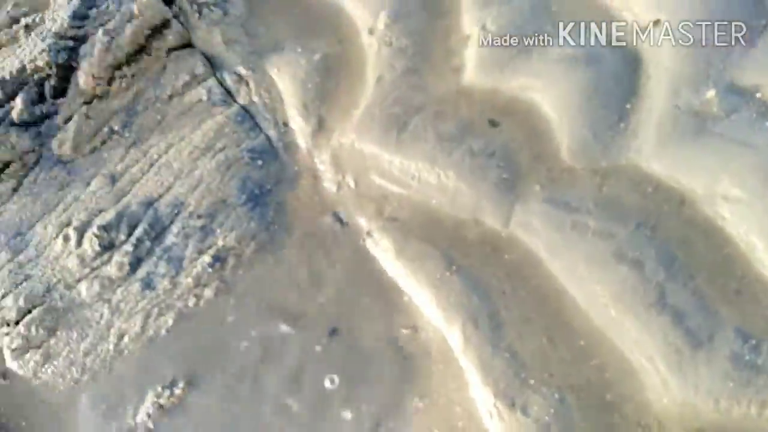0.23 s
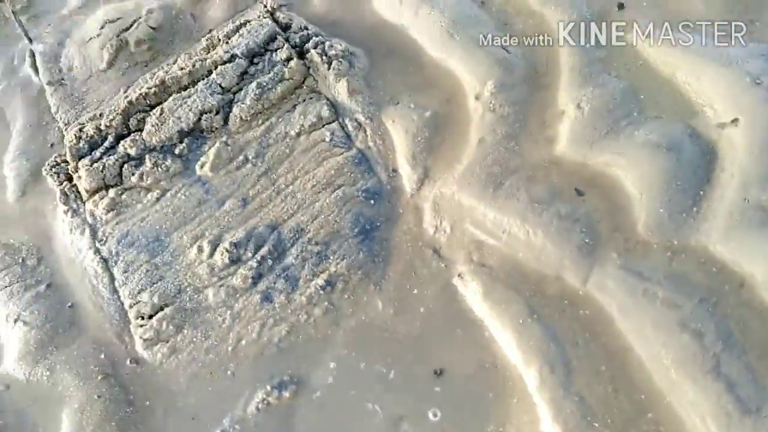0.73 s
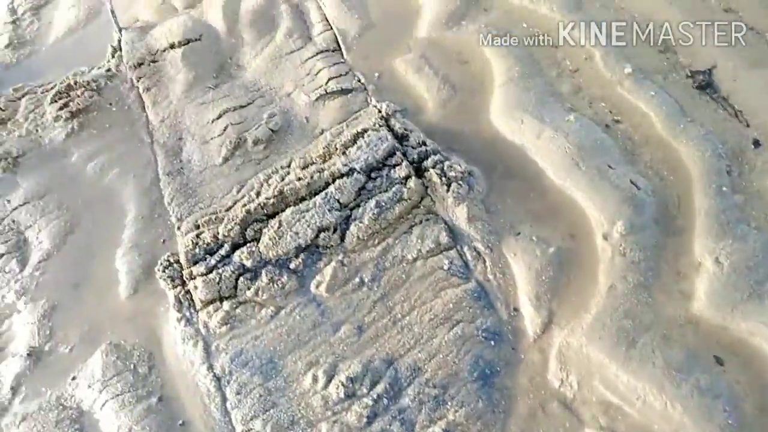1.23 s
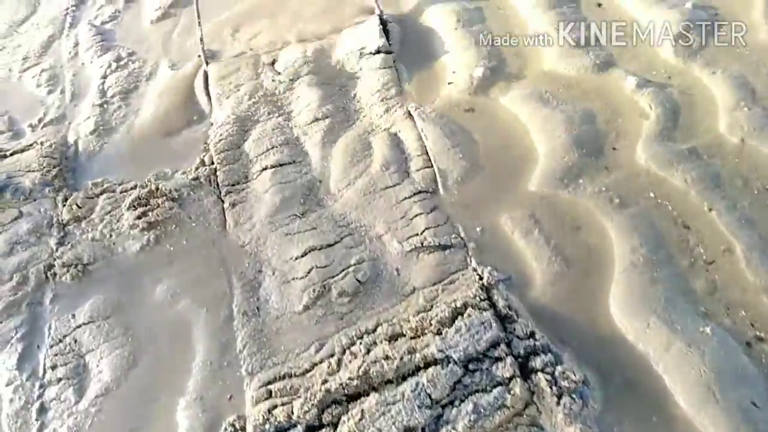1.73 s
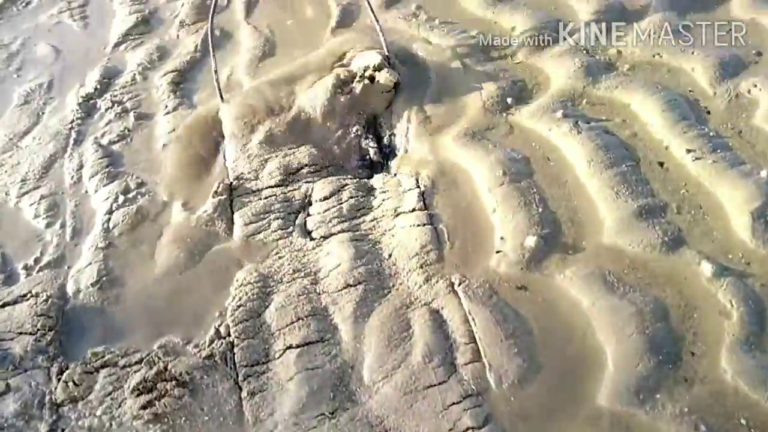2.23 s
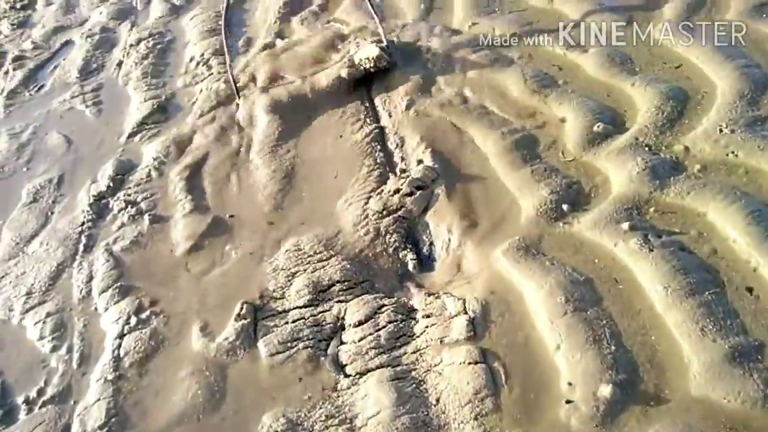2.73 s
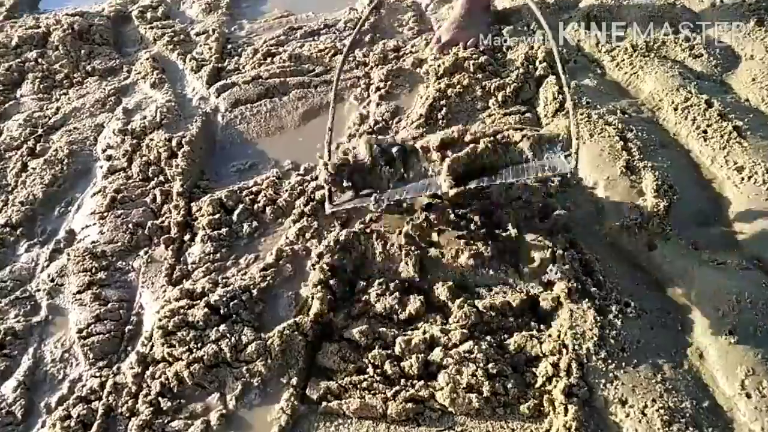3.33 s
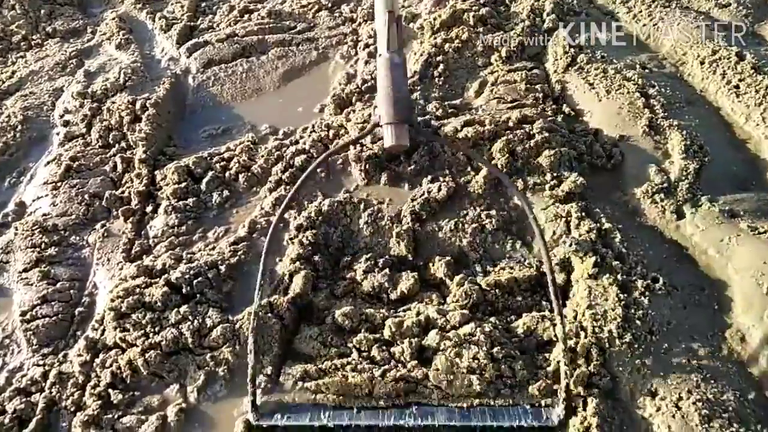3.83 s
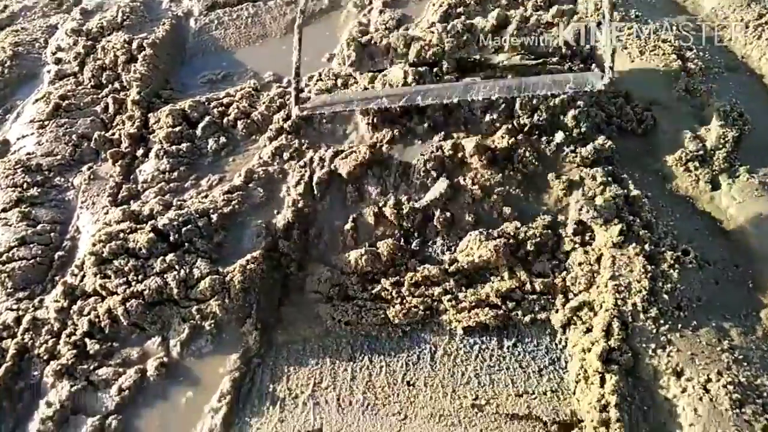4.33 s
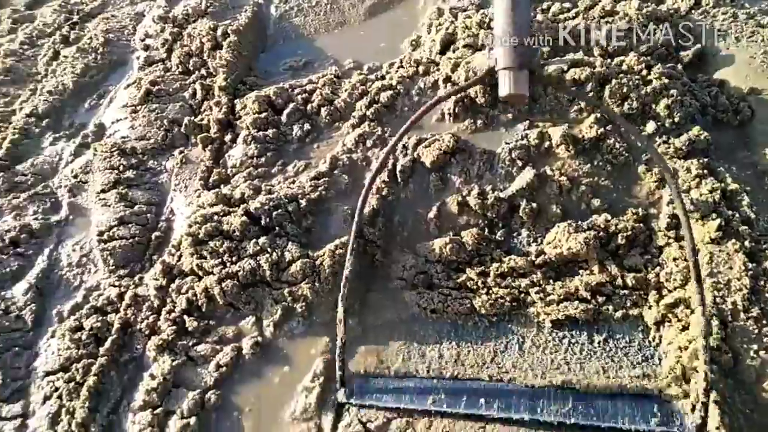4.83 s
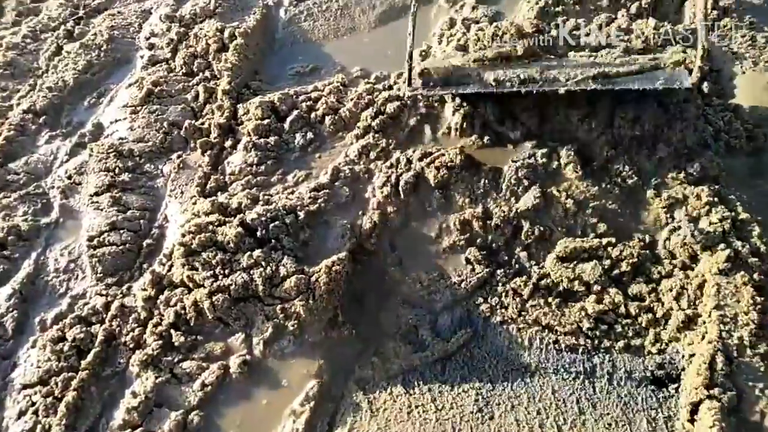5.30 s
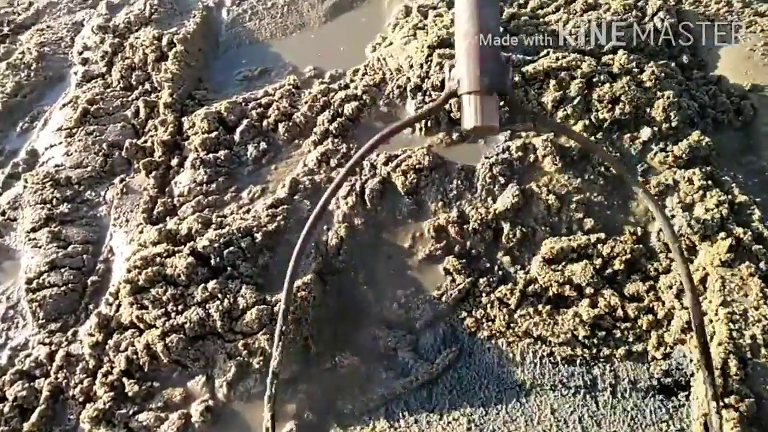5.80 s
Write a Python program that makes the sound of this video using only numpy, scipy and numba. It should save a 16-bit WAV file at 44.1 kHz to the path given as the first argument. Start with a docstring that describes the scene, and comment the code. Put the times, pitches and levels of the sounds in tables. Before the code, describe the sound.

Wet sand grinds on a metal blade in faint open air, very near the microphone. A long quiet draw opens with a bright double crack, then gives way to short digs with low rumble, a faint hum of the wire frame and moist squelches. After a quieter moment with tiny high ticks, the strokes grow louder and rougher, with slaps, thuds and snapping shell bits.

```python
"""A steel clam rake is pulled through wet sand on a tidal flat, close to the microphones, in faint open air.
First comes a long slow draw of about 2 s: grains grind and crumbs crunch on the blade, the wire frame hums
and packed sand rumbles; early on, shell bits crack on the steel and a wet clod slaps down.
Five short digs follow, each squelching in its furrow, with a few low bubble plops, and tiny grit ticks
mostly around 3 s. Sand scuffs the steel throughout; more clods land and shells click from 3.5 s to the end."""
import sys
import numpy as np
from scipy import signal
from scipy.fft import rfft, irfft
from scipy.io import wavfile
from scipy.ndimage import uniform_filter1d
from numba import njit

SR = 44100
rng = np.random.default_rng(int(sys.argv[2]) if len(sys.argv) > 2 else 0)


def dump(signal):
    """Clip the signal to [-1, 1] and save it as 16-bit WAV at the path in sys.argv[1]."""
    limited = np.clip(np.atleast_2d(signal).T, -1, 1)
    pcm = np.round(limited * 32767).astype(np.int16)
    wavfile.write(sys.argv[1], SR, pcm)


N = 267290
TIME = np.arange(N) / SR  # [s]


def undb(db):
    """Decibels to amplitude gain."""
    return 10 ** (np.asarray(db) / 20)


def unit(x):
    """Scale to rms 1."""
    return x / np.sqrt(np.mean(x ** 2) + 1e-18)


def curves(table):
    """One control per column, joined by straight lines in time."""
    s, *columns = np.transpose(table)
    return [np.interp(TIME, s, column) for column in columns]


def pan(db):
    """Left and right gains for a left minus right level difference in dB."""
    return undb(np.array([[db], [-db]]) / 2)


def colour(x, points):
    """Causal minimum-phase filter through (frequency [Hz], level [dB]) points."""
    hz, db = np.transpose(points)
    size = 2048
    bins_hz = np.fft.rfftfreq(size, 1 / SR) + 1  # +1 keeps the logarithm finite
    log_gain = np.log(undb(np.interp(np.log(bins_hz), np.log(hz), db)))
    # folding the cepstrum forward in time makes the response causal
    cepstrum = irfft(log_gain)
    cepstrum[1:size // 2] *= 2
    cepstrum[size // 2 + 1:] = 0
    response = irfft(np.exp(rfft(cepstrum)))
    return signal.fftconvolve(x, response[None], axes=1)[:, :x.shape[1]]


@njit
def svf(x, g, k):
    """State-variable band-pass whose tuning g and damping k move with every sample."""
    y, band, low = np.empty(len(x)), 0., 0.
    for i in range(len(x)):
        v = (band + g[i] * (x[i] - low) + 1e-18) / (1 + g[i] * (g[i] + k[i]))
        band = 2 * v - band
        low = low + 2 * g[i] * v
        y[i] = k[i] * v
    return y


def resonate(x, hz, width):
    """A resonance on both channels, gain 1 at the centre."""
    hz = np.minimum(hz, .45 * SR) * np.ones(x.shape[1])
    return np.array([svf(channel, np.tan(np.pi * hz / SR), width / hz) for channel in x])


def steep(x, hz, width):
    """A resonance passed twice, for dark skirts."""
    return resonate(resonate(x, hz, width), hz, width)


def grains(per_s, spread_db, lag_s, hiss):
    """Tiny random fractures, a few much larger, over a finer hiss; each has its own lag between the channels."""
    chance, size, place = rng.random((3, N))
    at = np.flatnonzero(chance < per_s / SR)
    size_db = spread_db * np.minimum(-np.log(size[at] + 1e-9), 4.5)
    size = undb(size_db) * rng.choice([-1, 1], N)[at]
    lag = np.round((2 * place[at] - 1) * lag_s * SR).astype(int)
    late = np.clip(at + lag, 0, N - 1)
    ears = np.array([np.bincount(at, size, N), np.bincount(late, size, N)])
    return unit(unit(ears) + hiss * rng.standard_normal((2, N)))


def noise(apart, size):
    """Noise common to both channels, plus a part that differs."""
    mid, side = rng.standard_normal((2, size))
    return unit(np.array([mid + apart * side, mid - apart * side]))


def burst(x, envelope):
    """Give a decaying sound the rms of its envelope, so its level refers to the top of that envelope."""
    return unit(x) * np.sqrt(np.mean(envelope ** 2))


def add(out, s, sound):
    """Mix a sound in at a time in s."""
    i = max(int(s * SR), 0)
    out[:, i:i + sound.shape[1]] += sound[:, :N - i]


def walk(rate):
    """Random levels held 1 / rate s and smoothed; spread near 1."""
    k = max(int(SR / rate), 1)
    steps = np.repeat(rng.standard_normal(N // k + 1), k)
    return unit(uniform_filter1d(steps, k)[:N])


def echo(x, lag_s, gain):
    """Add a close reflection whose lag moves."""
    return x + gain * np.array([np.interp(TIME - lag_s, TIME, channel) for channel in x])


def stroke(s, attack_s, hold_s, sag_db_s, release_s):
    """The force of one push: it swells until s, sags from then on, and dies away after the hold."""
    age = TIME - s
    swell = np.exp(-(np.maximum(-age, 0) / attack_s) ** 3)
    sag = undb(-sag_db_s * np.maximum(age, 0))
    return swell * sag * np.exp(-np.maximum(age - hold_s, 0) / release_s)


def together(forces, dbs):
    """Power-summed amplitude of overlapping pushes, each at its own level."""
    return np.sqrt(sum((force * undb(db)) ** 2 for force, db in zip(forces, dbs)))


def leading(forces, pitches):
    """A pitch drawn towards whichever push is strongest at each moment."""
    weights = np.array(forces) ** 2 + 1e-18
    return sum(w * hz for w, hz in zip(weights, pitches)) / weights.sum(0)


# grit and crumb spectra: (frequency [Hz], relative level [dB])
GRIT_SPECTRUM = [(900, -50.5), (2000, -13), (3800, -13), (5000, -6.5), (6300, -2.5), (7400, 3.5),
                 (8300, 3.5), (9500, -2.5), (11500, -10.5), (14200, -20.5)]
CRUNCH_SPECTRUM = [(400, -40), (800, -16.5), (1200, -4), (1600, 0), (2300, 3.5), (3200, -2), (4200, -6),
                   (6000, -5), (10000, -46.5)]
COARSE_SPREAD_DB, COARSE_GAIN = 3.5, 1.8  # gain over the fine grit at full force


def sand(grit_gain, crunch_gain):
    """Grains grind on the blade and crumbs break, in small uneven slips."""
    slips_db = 0.56 * walk(rate=57) + 0.35 * walk(rate=13)
    grit = grains(per_s=6000, spread_db=2.5, lag_s=.0004, hiss=0.4)
    grit = unit(colour(grit, GRIT_SPECTRUM))
    # a hard pull drags coarser grains along, which sound lower
    force = np.clip((20 * np.log10(grit_gain + 1e-9) + 32.0) / 10, 0, 1)
    coarse = grains(per_s=1300, spread_db=COARSE_SPREAD_DB, lag_s=0.00044, hiss=0.91)
    coarse = unit(steep(coarse, hz=6230, width=3800))
    coarse_gain = COARSE_GAIN * force
    grit = (grit + coarse_gain * coarse) / np.sqrt(1 + coarse_gain ** 2)

    crumbs = grains(per_s=2200, spread_db=0.5, lag_s=0.00031, hiss=0.74)
    # water films snap between the crumbs, ringing briefly at a wandering pitch
    films = unit(steep(crumbs, 2450 * np.exp(0.32 * walk(rate=100)), 440))
    # crumbs of different sizes give way in turn, so the crunch shifts in colour
    patches = unit(steep(crumbs, 2500 * np.exp(.3 * walk(rate=22)), 900))
    patches = patches * undb(3.5 * walk(rate=45))
    crunch = unit(unit(colour(crumbs, CRUNCH_SPECTRUM)) + 0.4 * films + 0.4 * patches)

    scrape = grit * grit_gain + crunch * crunch_gain
    # the wet surface mirrors the scrape; the path changes as the rake moves
    return echo(scrape * undb(slips_db), lag_s=.0023 + 0.000233 * walk(rate=5), gain=0.44)


# the long draw with the blade buried, levels before the slips and echo of the sand:
# (time [s], grit level [dB], crunch level [dB], frame hum level [dB])
LONG_DRAW = [(0.0, -42, -50, -59.5), (0.39, -40, -50.5, -60), (0.54, -44.5, -48, -55.5),
             (0.66, -40.5, -53.5, -55), (0.92, -40.5, -54.5, -53), (1.13, -45, -54, -61.5),
             (1.65, -46.5, -56.5, -62.5), (1.88, -46.5, -51.5, -61.5), (2.0, -42.5, -57, -86)]


def draw(release_s):
    """Amplitudes of grit, crunch and frame hum in the long draw; they fade as the blade surfaces."""
    surfacing_s = LONG_DRAW[-1][0]
    buried = np.exp(-np.maximum(TIME - surfacing_s, 0) / release_s)
    return undb(curves(LONG_DRAW)) * buried


# the blade cuts a furrow, levels at full force: (time of full force [s], grit and crunch attack [s], hold [s],
# grit [dB], crunch [dB], frame hum [dB], squelch [dB], furrow pitch at first [Hz], furrow pitch at last [Hz])
FURROW_DIGS = [(2.063, 0.067, 0.29, -37.5, -49, -46.5, -54.5, 850, 900),
               (2.464, 0.13, 0.49, -35.5, -40, -54, -48.5, 1090, 1690),
               (3.929, 0.14, 0.37, -27.5, -37, -48, -44.5, 1490, 546),
               (4.957, 0.15, 0.17, -29.5, -41, -52, -45, 1540, 970),
               (5.975, 0.02, .1, -28.5, -38, -76.5, -66, 700, 670)]
DIG_SAG_DB_S, DIG_RELEASE_S = 21.5, .04
SQUELCH_ATTACK_S, SQUELCH_SAG_DB_S = 0.068, 30  # the frame hum of the digs shares these
FURROW_SETTLES = 0.2  # time constant of the pitch glide, as a share of the hold


def digs():
    """Amplitudes of grit, crunch, frame hum and squelch in the digs, and the furrow's gliding pitch."""
    *_, grit_db, crunch_db, hum_db, squelch_db, _, _ = np.transpose(FURROW_DIGS)
    forces, suction, glides = [], [], []
    for s, attack, hold, *_, first, last in FURROW_DIGS:
        forces.append(stroke(s, attack, hold, DIG_SAG_DB_S, DIG_RELEASE_S))
        suction.append(stroke(s, SQUELCH_ATTACK_S, hold, SQUELCH_SAG_DB_S, DIG_RELEASE_S))
        unsettled = np.exp(-np.maximum(TIME - s, 0) / (FURROW_SETTLES * hold))
        glides.append(last * (first / last) ** unsettled)
    grit, crunch = together(forces, grit_db), together(forces, crunch_db)
    hum, wet = together(suction, hum_db), together(suction, squelch_db)
    return (grit, crunch, hum, wet), leading(suction, glides)


# loose sand scuffs over the steel or slides off it, levels at full force:
# (time of full force [s], attack [s], hold [s], grit level [dB], crunch level [dB], frame hum level [dB])
SAND_SCUFFS = [(0.169, 0.051, 0.07, -37, -51, -74), (0.212, .006, 0.0089, -36.5, -41, -72),
               (0.392, 0.007, 0.0048, -35, -51, -52), (0.537, 0.08, 0.1, -36.5, -44.5, -72),
               (1.32, 0.014, 0.022, -47, -47.5, -50.5), (2.168, 0.055, 0.057, -35.5, -42, -48),
               (2.993, 0.015, 0.096, -53, -55.5, -67.5), (3.313, 0.061, 0.055, -48, -62.5, -68),
               (3.349, 0.023, 0.091, -39, -50.5, -64), (3.441, 0.033, 0.019, -37, -45, -75),
               (3.559, 0.068, 0.018, -31.5, -40.5, -48.5), (3.643, 0.017, 0.028, -43.5, -55, -61.5),
               (3.709, 0.0074, 0.031, -31.5, -41, -54.5), (4.33, 0.0089, 0.0045, -33.5, -45, -62),
               (4.413, 0.038, 0.056, -36.5, -47, -60), (4.434, 0.0038, 0.016, -32.5, -38, -41),
               (4.525, 0.027, 0.077, -47.5, -55, -60), (4.709, 0.024, 0.0085, -33, -46, -48),
               (4.955, 0.012, 0.0099, -27.5, -43, -62), (5.217, 0.068, 0.019, -36.5, -48.5, -63),
               (5.335, 0.053, 0.11, -32.5, -41, -63.5), (5.573, 0.028, 0.0055, -40, -55, -62.5),
               (5.633, 0.12, 0.062, -52.5, -58, -75), (5.783, 0.0054, 0.021, -56, -63, -74),
               (5.95, 0.062, .03, -45, -51.5, -72)]
SCUFF_SAG_DB_S, SCUFF_RELEASE_S = 28.5, 0.03


def scuffs():
    """Amplitudes of grit, crunch and frame hum in the short scuffs."""
    forces = [stroke(s, attack, hold, SCUFF_SAG_DB_S, SCUFF_RELEASE_S)
              for s, attack, hold, *_ in SAND_SCUFFS]
    return [together(forces, dbs) for dbs in np.transpose(SAND_SCUFFS)[3:]]


def squelch(gain, hz):
    """Wet pores fizz in the broad hollow of the furrow, whose pitch moves."""
    pops = grains(per_s=3000, spread_db=1.2, lag_s=0.00017, hiss=0.6) * undb(1.2 * walk(rate=40))
    furrow = steep(pops, hz, width=.9 * hz)
    # dividing by sqrt(hz) evens out the power as the bandwidth follows the pitch
    return gain * unit(furrow / np.sqrt(hz))


# modes of the unloaded wire frame: (frequency [Hz], half the width of each filter pass [Hz], relative level [dB])
FRAME_MODES = [(555, 46.4, 12), (993, 66, 7), (1443, 58, 5.5), (1873, 50, -1.5), (2588, 39, 4.5)]
# a load of sand stiffens the frame: (time [s], shift of the lowest mode [Hz])
SAND_LOAD = [(1.96, -7.5), (2.06, 149), (2.95, 181), (3.1, 1.5), (3.42, 129), (3.56, 131), (3.7, 6),
             (4.0, 82), (5.2, 37)]
HUM_PATCHY_DB = 2.5


def frame_hum(gain):
    """The steady rub of the sand rings the modes of the wire frame, which the load of sand retunes."""
    detune = 1 + 0.01 * walk(rate=7)  # the shifting load
    lift, = curves(SAND_LOAD)
    rub = noise(apart=0.43, size=N)
    hum = np.zeros((2, N))
    lowest_hz = FRAME_MODES[0][0]
    for k, (hz, width, db) in enumerate(FRAME_MODES):
        # each mode swells and fades on its own as the grip of the sand shifts
        swell = undb(db + HUM_PATCHY_DB * walk(rate=23))
        mode_hz = hz * detune + lift * np.sqrt(lowest_hz / hz)  # higher modes shift less
        hum += (-1) ** k * swell * steep(rub, mode_hz, 2 * width)
    return gain * unit(hum)


# packed sand shears under the load: (time of full force [s], hold [s], level [dB], pitch [Hz])
SAND_HEAVES = [(0.438, 0.45, -58, 174.6), (2.11, 0.044, -57.5, 330), (2.378, 0.35, -46, 202),
               (2.888, 0.02, -60, 119), (3.044, 0.01, -58.5, 132), (3.405, 0.024, -56, 88),
               (3.515, 0.031, -48.5, 95), (4.06, 0.56, -59.5, 410), (4.413, 0.0077, -67, 130),
               (4.71, 0.17, -54.5, 344), (4.962, .14, -58.5, 112), (5.893, .06, -72, 275)]
HEAVE_ATTACK_S, HEAVE_SAG_DB_S, HEAVE_RELEASE_S = 0.033, 9.5, 0.072
GROUND_HZ, RUMBLE_WIDTH = 132, .42  # width of each filter pass as a share of the pitch
RUMBLE_LUMPY_DB = 1.6


def rumble():
    """Packed sand gives way in dull, overlapping jolts."""
    _, _, dbs, pitches = np.transpose(SAND_HEAVES)
    forces = [stroke(s, HEAVE_ATTACK_S, hold, HEAVE_SAG_DB_S, HEAVE_RELEASE_S)
              for s, hold, *_ in SAND_HEAVES]
    hz = leading(forces, pitches)
    jolts = grains(per_s=260, spread_db=1.8, lag_s=0.0004, hiss=0.2)
    jolts = jolts * undb(RUMBLE_LUMPY_DB * walk(rate=24))
    # the shearing sand rings at its moving pitch, the ground at a fixed one
    shear = steep(jolts, hz, RUMBLE_WIDTH * hz)
    ground = steep(jolts, GROUND_HZ, RUMBLE_WIDTH * GROUND_HZ)
    body = steep(shear + 1.25 * ground, 0.94 * hz, 0.59 * hz)
    return unit(body / np.sqrt(hz)) * together(forces, dbs)


# spectrum of shell bits, also used for the spray of the slaps: (frequency [Hz], relative level [dB])
SHELL_SPECTRUM = [(200, -30), (1200, -21.5), (2700, 1), (4200, -7), (6000, -1.5), (8000, 8.5),
                  (10500, -10.5), (14500, -12)]
# shell bits on the steel: (time [s], onset level [dB], pitch [Hz], left minus right [dB], crack decay [s])
SHELL_CLICKS = [(0.1368, -1.5, 5700, 3, 0.00072), (0.1474, 1, 7700, -6.5, 0.00055),
                (.535, -24, 5360, 6, 0.0023), (0.641, -15.5, 6840, 1.5, 0.002),
                (1.3251, -20.5, 7460, -2, 0.0014), (3.566, -17.5, 2240, 2, 0.00056),
                (3.908, -16, 1600, 0.5, .0009), (3.908, -14, 7500, 2, .0005),
                (4.1811, -14, 6300, -2, 0.0011), (4.2455, -24, 8700, 2.5, .0008),
                (4.438, -24, 8100, 1, 0.00064), (4.5156, -31.5, 2200, 2, 0.0022),
                (4.7291, -11, 7100, 2, 0.0017), (5.2772, -19, 7000, 8, 0.00058),
                (5.2798, -12, 9140, 0.5, 0.002), (5.3163, -23.5, 5500, 6, .0015),
                (5.3767, -22, 5160, 9, .0015), (5.3902, -10.5, 7300, -6, 0.0008),
                (5.863, -14, 8400, 0, 0.002), (5.9706, -4, 6700, 3.5, 0.0014), (5.983, -10, 6800, 6, .0006),
                (5.993, -11, 6300, -7, 0.00056), (6.034, -16.5, 3800, 3, 0.00083)]


def clicks(rise_s, ring_s, ring_db, lag_s):
    """A shell bit snaps against the steel: a sharp crack and a short ring that the sand smothers."""
    out, t = np.zeros((2, N)), TIME[:SR // 20]
    for s, db, hz, pan_db, crack_s in SHELL_CLICKS:
        decay = np.exp(-t / crack_s) + undb(ring_db) * np.exp(-t / ring_s)
        envelope = (1 - np.exp(-t / rise_s)) * decay
        crack = rng.standard_normal((2, len(t))) * envelope
        snap = 0.52 * unit(colour(crack, SHELL_SPECTRUM)) + unit(steep(crack, hz, 0.67 * hz))
        left, right = (burst(port, envelope) for port in snap)
        right = np.interp(t - lag_s, t, right)  # the right channel lags
        add(out, s, np.array([left, right]) * undb(db) * pan(pan_db))
    return out


# clods and the blade landing in wet sand:
# (time [s], splat level [dB], splat pitch [Hz], spray level [dB], thud level [dB], thud pitch [Hz])
WET_SLAPS = [(.135, -27.5, 720, -14.5, -31.5, 253), (1.289, -40, 915, -60, -75, 400),
             (1.32, -31, 760, -35, -54, 463), (1.35, -43, 1190, -53, -73, 400),
             (3.564, -27, 566, -22, -29, 217), (3.743, -27.5, 1460, -20.5, -50, 206),
             (3.905, -18.5, 1240, -20, -37, 276), (4.179, -37.5, 610, -25, -66, 297),
             (4.438, -25.5, 1340, -23, -39, 266), (4.725, -22, 1480, -20.5, -27, 134),
             (4.963, -24.5, 1300, -26, -34, 217), (5.8453, -26.5, 1230, -21.5, -32, 268),
             (5.861, -28.5, 1520, -19.5, -38, 136), (5.968, -37, 830, -14.5, -47, 155)]


def slaps(rise_s, splat_s, spray_s, thud_s, settle_s, settle_db):
    """Wet sand lands: a hollow splat, a spray of grains and a thud in the ground, which then settles."""
    out, t = np.zeros((2, N)), TIME[:SR // 3]
    rise = 1 - np.exp(-t / rise_s)
    splat_env, spray_env, thud_env, settling = (
        rise * np.exp(-t / fade) for fade in (splat_s, spray_s, thud_s, settle_s))
    thud_env = thud_env + undb(settle_db) * settling
    for s, splat_db, hz, spray_db, thud_db, thud_hz in WET_SLAPS:
        splat = steep(noise(apart=0.3, size=len(t)) * splat_env, hz, 0.75 * hz)
        spray = colour(noise(apart=0.82, size=len(t)) * spray_env, SHELL_SPECTRUM)
        thud = steep(noise(apart=0.3, size=len(t)) * thud_env, thud_hz, 1.25 * thud_hz)
        add(out, s, undb(splat_db) * burst(splat, splat_env))
        add(out, s, undb(spray_db) * burst(spray, spray_env))
        add(out, s, undb(thud_db) * burst(thud, thud_env) * pan(1.9))
    return out


# low bubble plops and tiny high ticks of grit:
# (time [s], level before opening, decay and pan [dB], base pitch [Hz], decay time [cycles])
PLOPS_AND_TICKS = [(.417, -36.5, 497, 1.1), (1.169, -38.5, 1830, 8.8), (2.3202, -28.5, 714, 7.3),
                   (2.461, -34, 583, 2.8), (2.925, -43.5, 798, 7.3), (2.936, -38, 1040, 4.4),
                   (2.9392, -26, 8100, 6), (2.987, -25.5, 8500, 6.1), (3.079, -30, 9050, 5),
                   (3.1694, -33, 7630, 12), (3.187, -40.5, 7700, 6.6), (3.215, -27, 8430, 9.2),
                   (3.231, -38, 8500, 6), (3.3455, -23, 7870, 6), (5.724, -43, 580, 1.5)]


def plops_and_ticks(opening, rise):
    """A bubble or grit tick opens softly and rings for a few cycles, rising a little in pitch."""
    out, t = np.zeros((2, N)), TIME[:SR // 10]
    for s, db, hz, cycles in PLOPS_AND_TICKS:
        age = hz * t / cycles  # in decay times
        phase = 2 * np.pi * hz * t * (1 + rise * np.tanh(age))
        ring = np.exp(-age) * np.sin(phase)
        swell = 1 - np.exp(-(age / opening) ** 2)
        add(out, s, undb(db) * swell * ring * pan(5.1))
    return out


# spectrum of the open air: (frequency [Hz], relative level [dB])
AIR_SPECTRUM = [(25, -11.5), (80, -3.5), (160, -2.5), (350, -17), (560, -17), (900, -20), (2000, -12),
                (4000, -32.5), (8000, -13), (14000, -34.5)]


def air():
    """Faint open air over the flat: coloured noise whose level drifts slowly."""
    breeze = unit(colour(noise(apart=0.34, size=N), AIR_SPECTRUM))
    return breeze * undb(-68.5 + 1.1 * walk(rate=0.98))


def scene():
    """The rake at work under an open sky."""
    draw_grit, draw_crunch, draw_hum = draw(release_s=0.029)
    (dig_grit, dig_crunch, dig_hum, dig_squelch), furrow_hz = digs()
    scuff_grit, scuff_crunch, scuff_hum = scuffs()
    # overlapping movements add in power
    grit = np.linalg.norm([draw_grit, dig_grit, scuff_grit], axis=0)
    crunch = np.linalg.norm([draw_crunch, dig_crunch, scuff_crunch], axis=0)
    hum = np.linalg.norm([draw_hum, dig_hum, scuff_hum], axis=0)
    rake = sand(grit, crunch) + squelch(dig_squelch, furrow_hz) + frame_hum(hum)
    shells = clicks(rise_s=0.00013, ring_s=0.0038, ring_db=-21, lag_s=0.00021)
    clods = slaps(rise_s=0.0014, splat_s=0.005, spray_s=0.0087, thud_s=0.0047,
                  settle_s=0.086, settle_db=-20.5)
    small_rings = plops_and_ticks(opening=0.25, rise=0.029)
    return rake + rumble() + shells + clods + small_rings + air()


# the two microphone ports colour the sound differently: (frequency [Hz], left minus right [dB])
PORT_COLOURS = [(60, 5), (110, 5.5), (200, 1), (380, -0.5), (700, 1.5), (1290, -1), (2370, 2), (4380, -2),
                (8090, 2.5), (14900, 4.5)]
TOP_HZ = 14500


def record(dry):
    """Each port has its own colour; the sound is clipped at full scale, then its top is cut steeply."""
    left = colour(dry[:1], [(hz, db / 2) for hz, db in PORT_COLOURS])
    right = colour(dry[1:], [(hz, -db / 2) for hz, db in PORT_COLOURS])
    clipped = np.clip(np.vstack([left, right]), -1, 1)
    low_pass = signal.ellip(8, .2, 70, TOP_HZ, fs=SR, output="sos")
    return signal.sosfilt(low_pass, clipped)


dry = scene()
out = record(dry)
dump(out)
```